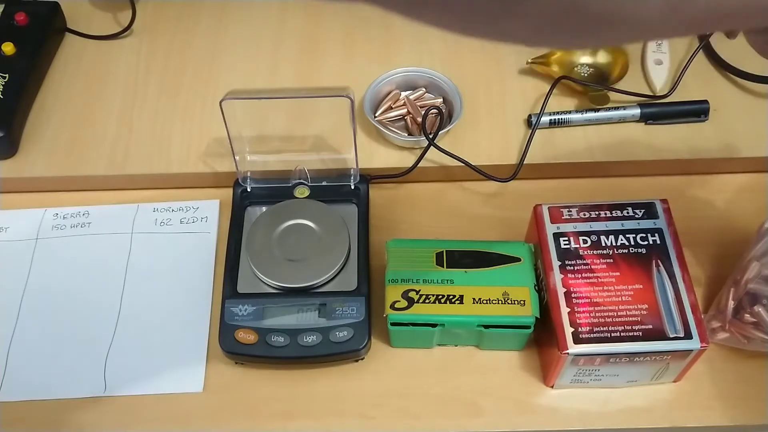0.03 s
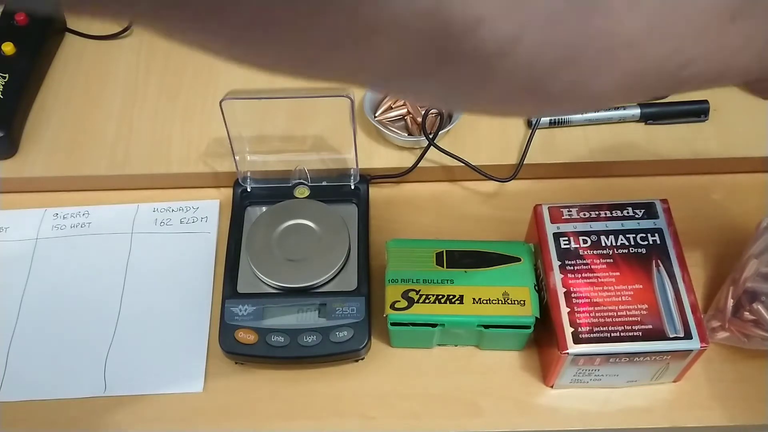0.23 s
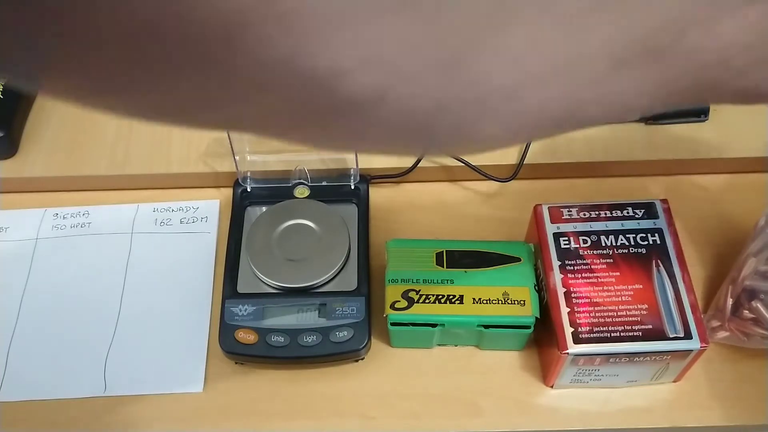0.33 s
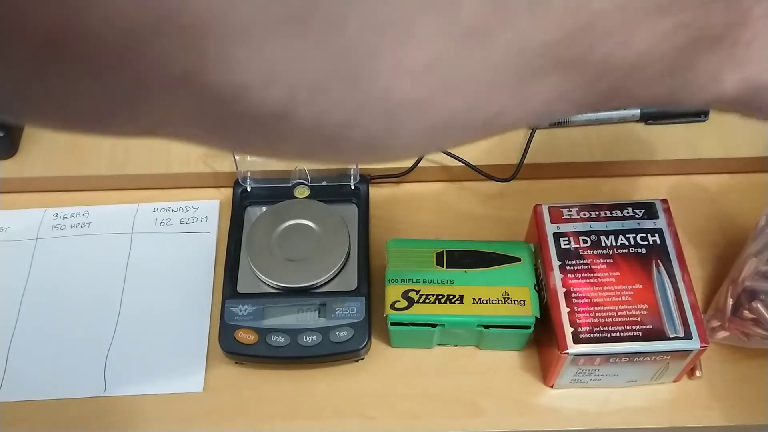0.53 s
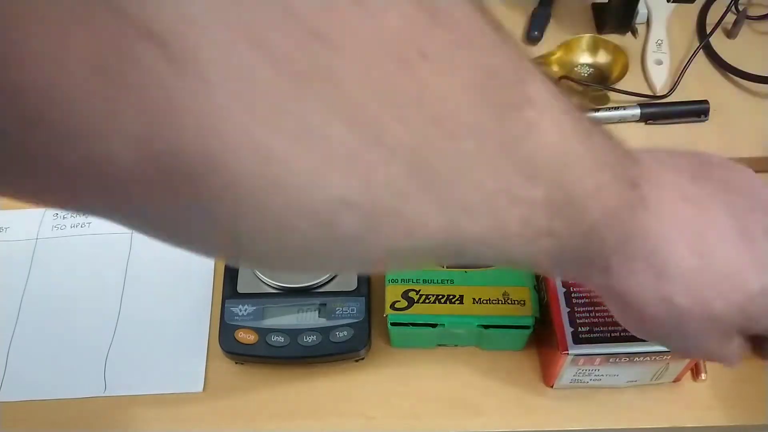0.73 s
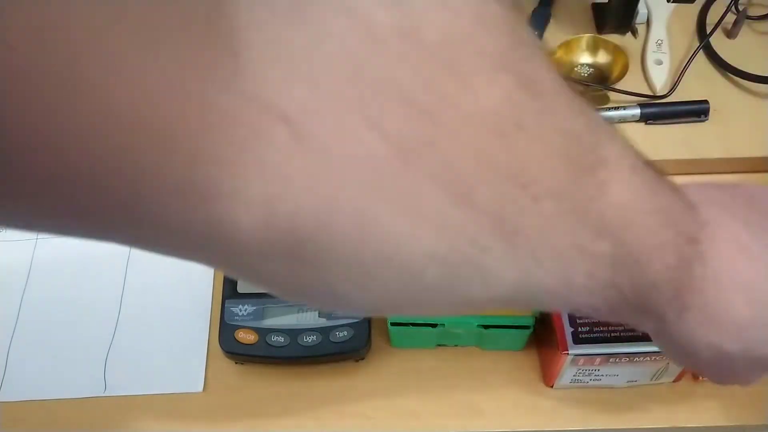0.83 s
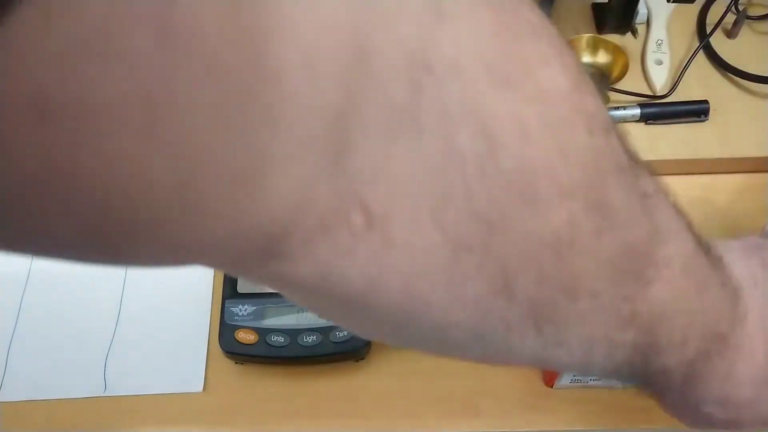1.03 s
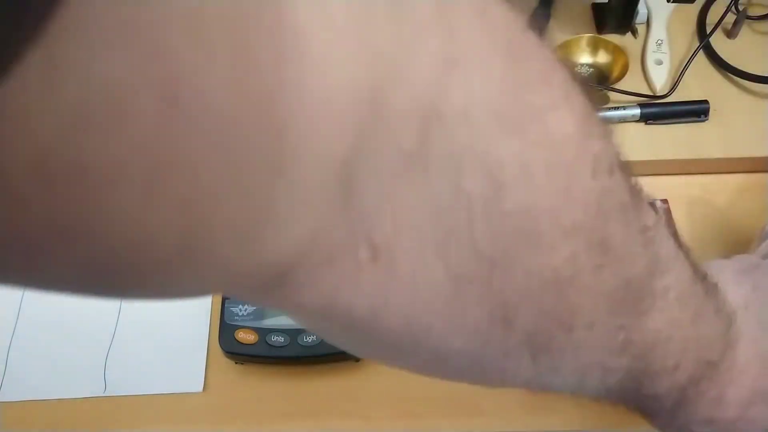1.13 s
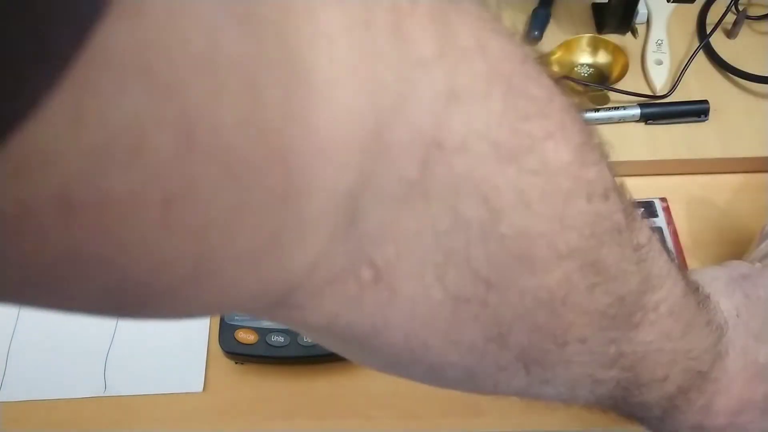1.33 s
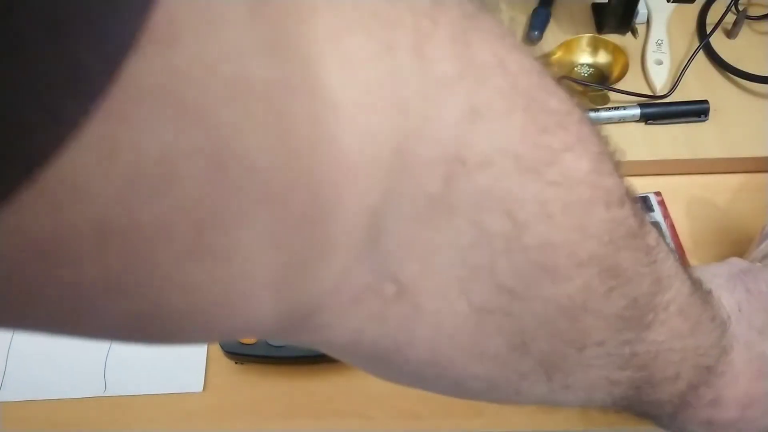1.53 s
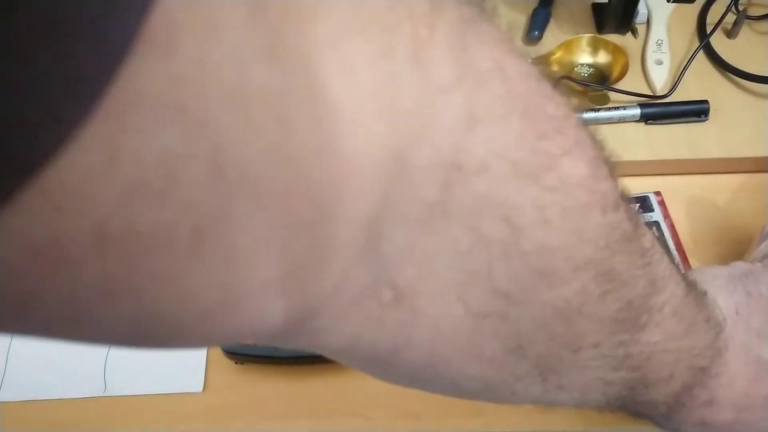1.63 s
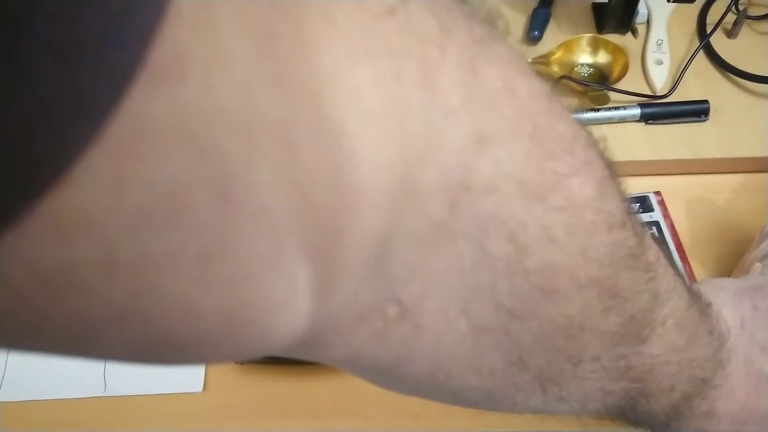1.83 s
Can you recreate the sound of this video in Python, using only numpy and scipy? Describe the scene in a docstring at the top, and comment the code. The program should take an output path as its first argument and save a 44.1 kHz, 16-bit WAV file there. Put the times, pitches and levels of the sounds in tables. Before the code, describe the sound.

A bag of loose metal bullets lands on a wooden desk, close on the right: sharp plastic crackle and dense clinking, smaller clinks as the heap settles, then two soft knocks in a quiet small room.

```python
"""Bag of bullets set down on a desk

A plastic bag of loose metal bullets lands on a wooden desk, close to the right of the microphone.
Showers of contacts excite the resonances of the heap; short bright bursts are the snapping film.
Decaying sines and dull bursts are the desk, which gives two soft knocks later.
Decaying noise forms the small room, over soft steady noise and a low hum."""
import sys
import numpy as np
from scipy import signal
from scipy.fft import rfft
from scipy.io import wavfile
from scipy.ndimage import uniform_filter1d

SR = 44100
rng = np.random.default_rng(int(sys.argv[2]) if len(sys.argv) > 2 else 0)


def store_pcm(level_fs):
    """Save levels as 16-bit WAV."""
    pcm = np.round(np.clip(level_fs, -1, 1) * 32767).astype(np.int16)
    wavfile.write(sys.argv[1], SR, np.atleast_2d(pcm).T)


N = 83790  # length in samples


def bullets():
    """Modal resonance: each clump is a shower of metal contacts that rings the shifting heap."""
    # clumps of bullets falling together: t/s, level/dB (before clink_db), bass/dB, treble/dB, settling time/s
    clumps = [(0.2285, -20.5, 14.5, 9.5, 0.0035), (0.2459, -6, -3, 3.5, 0.0062),
              (0.2508, 1.5, 0.5, 0, 0.0089), (0.2605, -3, -3.5, 2, 0.0068), (0.2690, -5, -3.5, 6.5, 0.0047),
              (0.2775, -9.5, -10, -0.5, 0.0081), (0.2892, -14.5, -5.5, 1.5, 0.0062),
              (0.3121, -19, -15, 1, 0.0036), (0.3737, -7, -0.5, -19.5, 0.0095),
              (0.4030, -14, 0, -10, 0.0065), (0.4288, -16.5, 2, -5, 0.006), (0.453, -24, -4, 1.5, 0.0095),
              (0.4724, -18, 3, 14, 0.012), (0.4779, -3.5, -10, 3, 0.0076), (0.4896, -14, -5, 1, .012),
              (0.511, -24, 0, 15, 0.0055), (0.5255, -28, -6, -2, 0.0045), (0.5435, -5, -2.5, -3.5, 0.0089),
              (0.5550, -13, 6.5, -4, 0.005), (0.576, -29, -11, 17, 0.024), (0.6092, -11, 3, -2, 0.0069),
              (0.621, -12.5, -3.5, -2.5, 0.0052), (0.6430, -20, 7, 11.5, 0.011),
              (0.6566, -13.5, 1.5, 3, 0.014), (0.6830, -12.5, 1, -8.5, .013),
              (0.7081, -17, 5.5, -11, 0.0081), (0.739, -26, 12.5, -23, 0.017), (0.7870, -32, 7, -20, 0.017),
              (0.8172, -31.5, 4, -51, .014)]
    # colour of the heap: f/Hz, level/dB
    heap_colour = [(30, -42), (100, -17), (165, -32), (220, -20.5), (280, -10.5), (380, -9), (500, -4.5),
                   (640, -6), (1000, -3.5), (1500, 0), (2400, 2), (3300, -2.5), (4400, -10.5),
                   (6000, -22.5), (7400, -21), (9000, -26), (12000, -29), (15000, -25.5)]
    # resonances and hollows of the heap on the desk: f/Hz, width/Hz (before the floor min_width_hz),
    # level over the colour while landing/dB, level over the colour once lying/dB
    rings = [(272, 25, 6, 6), (440, 92, 10, 8), (669, 70, -10.5, -7), (827, 26, 3, 7), (919.3, 42, 10, 7.5),
             (1050, 200, -4.5, 0.5), (1230, 35, 4.5, 2), (1315, 10, 3, 4.5), (1419, 69, 12, 10.5),
             (1460, 60, -10, -6), (1605, 32, 3, 5), (1698, 40, -3, -8), (1790, 20, 6.5, 3.5),
             (1885, 32, -10, -4.5), (2014, 35, -3.5, -8.5), (2155, 14, 4, 8), (2253, 19, 8.5, 8.5),
             (2402, 36, 9.5, 3), (2455, 40, -12.5, -2.5), (2853, 45, 3.5, 7.5), (2906, 27, 2.5, 4.5),
             (3012, 45, -0.5, -2.5), (3050, 28, 0, 3.5), (3320, 44, 11.5, 6), (3413, 62, -4, -4.5),
             (3550, 43, -8, -2), (3675, 34, 4, 5.5), (3980, 45, 9, 7.5), (4135, 94, 7, 4.5),
             (4320, 80, 1.5, -6.5), (4675, 59, 8, -0.5), (4965, 55, 11, -6), (7250, 400, 10.5, -2.5)]
    bass_hz, treble_hz = 810, 4060  # corners of each clump's own colour
    clink_db, landed_s = 17, .36
    ring_drift, ring_spread_db, min_width_hz = .004, 1., 42  # drift is a fraction of the frequency

    hz, out = grid(), np.zeros((2, N))
    ring_hz, width_hz, landing_db, lying_db = np.transpose(rings)
    width_hz = np.maximum(width_hz, min_width_hz)
    bass = 1 / (1 + (hz / bass_hz) ** 2)
    treble = 1 - 1 / (1 + (hz / treble_hz) ** 4)
    for s, db, bass_db, treble_db, settle_s in clumps:
        # every clump finds the heap slightly rearranged
        drift, favour = rng.standard_normal((2, len(rings)))
        centre_hz = ring_hz * (1 + ring_drift * drift)
        peaks = 1 / (1 + (2 * (hz[:, None] - centre_hz) / width_hz) ** 2)
        ring_db = landing_db if s < landed_s else lying_db
        heap_db = read(heap_colour, hz) + peaks @ (ring_db + ring_spread_db * favour)
        colour_db = heap_db + bass_db * bass + treble_db * treble
        clink = convolve(contacts(settle_s), ringing(colour_db))
        add(out, s, amp(clink_db + db) * unit(clink))
    return out


def bag():
    """Buckling and friction of a thin film: short bright snaps, and a faint rustle as it moves."""
    # snaps of the plastic film: t/s, level/dB
    snaps = [(0.191, -20), (0.213, -31.5), (0.2280, -15.5), (0.239, -14.5), (0.2461, -2.5), (0.2512, 5),
             (0.2540, -1.5), (0.3733, -8), (0.4791, -5.5)]
    # colour of the snaps: f/Hz, level/dB
    film = [(200, -22.5), (1000, 2.5), (3500, -0.5), (6000, 0), (10000, -11.5), (15000, -9)]
    # the bag is carried in and let go: t of the peak/s, RMS level at the peak/dB, half length/s
    rustles = [(0.0300, -60, .15), (1.6850, -60, .055)]
    # relative colour of the rustle: f/Hz, level/dB
    rustle_colour = [(100, -10.5), (330, 5), (450, 4), (800, -5.5), (1500, -5.5), (2600, -1.5), (3800, 1.5),
                     (5500, -8), (7400, -4), (10000, -5.5), (15000, -16.5)]
    snap_s = .002  # settling time

    t = np.arange(N) / SR
    rustle = convolve(rng.standard_normal((2, N)), ringing(read(rustle_colour, grid())))
    motion = sum(amp(db) * np.exp(-((t - s) / half_s) ** 2) for s, db, half_s in rustles)
    crackle = bursts([(s, db, snap_s) for s, db in snaps], film)
    return crackle + motion * rustle / rustle.std()


def desk():
    """Modal response of a struck plate: the bag touches the desk, lands on it, and is nudged later."""
    # dull scuffs of the bag and hand on the desk: t/s, level/dB, settling time/s
    scuffs = [(0.1480, -27, .008), (0.1915, -20, .008), (0.2392, -2, .004), (0.3880, -7, .007),
              (1.1520, -28, .012), (1.1780, -24, .008), (1.6275, -23, .007), (1.6420, -20, .008),
              (1.6860, -19, .009), (1.7130, -22, .009), (1.7450, -27, .006), (1.8050, -27, .025)]
    # colour of the scuffs: f/Hz, level/dB
    scuff_colour = [(60, -18), (170, -16), (400, 0), (600, -5), (800, -1), (1400, -1), (2000, -12),
                    (4000, -19), (8000, -30), (15000, -38)]
    # modes of the first touch: f/Hz, level/dB (before touch_db), T60/s
    touch = [(212, -6, 0.069), (390, -2.5, 0.034), (764, -0.5, .045), (1095, -7, 0.059)]
    # dull knocks on the desk: t/s, level/dB, pitch f/Hz, upper modes/dB, hold/s, T60 of the pitch/s
    knocks = [(0.2393, -12, 385, -9, .005, .02), (0.3880, -26, 365, -10, .005, .025),
              (1.6275, -29.5, 385, -2, .005, .02), (1.6860, -30.5, 371, -2, .013, .03)]
    # modes of the desk: ratio to the pitch, level/dB (before the knock's own), share of the ring time
    desk_modes = [(1, 0, 1), (2, -13, .9), (3, -7, .9), (3.35, -16, .7), (3.94, -8, .8)]
    # the whole desk gives under the weight: t/s, level/dB
    thuds = [(0.244, -37), (0.3850, -48), (0.487, -44), (0.551, -44.5), (0.704, -44), (1.011, -39.5),
             (1.164, -42.5)]
    touch_s, touch_db, touch_hold_s = .1912, -31, 0.0072
    blow_rise_s = .0012  # of the touch and the knocks
    thud_hz, thud_t60_s, thud_rise_s = 92, 0.12, 0.0043

    out = bursts(scuffs, scuff_colour)
    add(out, touch_s, amp(touch_db) * struck(touch, blow_rise_s, touch_hold_s))
    for s, db, pitch_hz, upper_db, hold_s, ring_s in knocks:
        modes = []
        for k, (ratio, mode_db, share) in enumerate(desk_modes):
            # upper_db sets the hardness of the blow: it spares the lowest mode
            modes.append((pitch_hz * ratio, mode_db + upper_db * (k > 0), ring_s * share))
        add(out, s, amp(db) * struck(modes, blow_rise_s, hold_s))
    for s, db in thuds:
        add(out, s, amp(db) * struck([(thud_hz, 0, thud_t60_s)], thud_rise_s))
    return out


def contacts(settle_s, size=4096):
    """Random impulse train: a first contact and a dying shower, whitened for each side."""
    contacts_per_s, spread_db = 7000, 3.5
    first_contact, gather_s = 0.9, .002

    t = np.arange(size) / SR
    signs = rng.choice([-1., 1.], (2, size))
    sizes = signs * amp(spread_db * np.clip(rng.standard_normal((2, size)), -2, 2))
    hits = rng.random((2, size)) < contacts_per_s / SR
    shower = sizes * hits * np.exp(-t / settle_s) * (1 - np.exp(-t / gather_s))
    shower[:, 0] = first_contact
    return evened(shower, size=18)


def bursts(rows, colour):
    """Source and filter: short showers of contacts through one spectral colour."""
    out, response = np.zeros((2, N)), ringing(read(colour, grid()))
    for s, db, settle_s in rows:
        add(out, s, amp(db) * unit(convolve(contacts(settle_s), response)))
    return out


def struck(modes, rise_s, hold_s=0, size=12000):
    """Modal synthesis: sines rise with a soft blow, hold while it pushes, then decay exponentially."""
    t = np.arange(size) / SR
    free_s = np.maximum(t - hold_s, 0)  # time since the push ended
    ring = 0
    for hz, db, t60 in modes:
        decay = np.exp(-np.log(1000) * free_s / t60)
        ring = ring + amp(db) * decay * np.sin(2 * np.pi * hz * t)
    return (1 - np.exp(-t / rise_s)) * ring


def shade_left(left):
    """Acoustic shadow: the left side, away from the source, is weaker by frequency."""
    # gain of the left side: f/Hz, level/dB
    shadow = [(60, -20), (200, -26), (380, -12), (700, -21), (1600, -19), (2400, -18), (4400, -16.5),
              (8000, -20), (10000, -17), (15000, -20)]
    return convolve(left, ringing(read(shadow, grid())))[0]


def room(x, count=4):
    """Reverberation: the echo pattern changes as the heap shifts, several tails taking turns."""
    shift_s = .07  # from one tail to the next
    turn = np.arange(N) / SR / shift_s
    out = 0
    for k in range(count):
        distance = abs((turn - k + count / 2) % count - count / 2)
        share = np.cos(np.pi / 2 * np.minimum(distance, 1))  # equal-power crossfade
        out = out + convolve(x * share, tail())
    return out


def tail(size=256):
    """Diffuse decay: noise in which each band dies at its own reverberation time."""
    # reverberation time of the room: f/Hz, T60/s
    room_t60 = [(100, 0.13), (300, 0.19), (700, 0.33), (1800, 0.24), (4500, 0.26), (9000, 0.45),
                (15000, 0.067)]
    delay_s = 0.013  # time scale on which the echoes build up

    hz, t, z = signal.stft(rng.standard_normal((2, SR // 2)), SR, nperseg=size)
    decay = np.exp(-np.log(1000) * t / read(room_t60, hz)[:, None])
    wash = signal.istft(z * decay, SR, nperseg=size)[1]
    build_up = 1 - np.exp(-(np.arange(wash.shape[1]) / SR / delay_s) ** 2)
    return unit(wash * build_up)


def air(size=1024):
    """Stationary background: soft, slightly patchy coloured noise and a sinusoidal mains hum."""
    # relative colour of the still air: f/Hz, level per Hz/dB
    air_colour = [(20, -22), (45, -4), (75, -3), (100, 1), (150, -8), (250, -5), (450, -1), (850, -4),
                  (1500, -12), (3000, -21), (6000, -31), (10000, -33), (15000, -34)]
    noise_db, patch_db = -54, 1.5
    hum_hz, hum_db = 100, -63  # RMS level, like noise_db on the right side
    left_db = -17.5  # left side relative to the right

    hz, t, z = signal.stft(rng.standard_normal((2, N)), SR, nperseg=size)
    patches = uniform_filter1d(rng.standard_normal(z.shape[1:]), size=10, axis=0)
    patches = uniform_filter1d(patches, size=6, axis=1)
    gain_db = read(air_colour, hz)[:, None] + patch_db * patches / patches.std()
    noise = signal.istft(z * amp(gain_db), SR, nperseg=size)[1][:, :N]
    hum = amp(hum_db) * np.sqrt(2) * np.sin(2 * np.pi * hum_hz * np.arange(N) / SR)
    return (amp(noise_db) * noise / noise.std() + hum) * amp([[left_db], [0]])


def amp(db):
    """Decibel law: level to amplitude ratio."""
    return 10 ** (np.asarray(db) / 20)


def unit(x):
    """Energy normalisation: scales each side to energy 1."""
    return x / np.sqrt(np.sum(x ** 2, -1, keepdims=True) + 1e-20)


def read(points, hz):
    """Interpolation of a table on a log-frequency axis."""
    f, value = np.transpose(points)
    return np.interp(np.log(hz + 1), np.log(f + 1), value)


def add(mix, s, sound):
    """Superposition: adds a sound to the mix from time s, cut at the end of the mix."""
    part = mix[:, round(s * SR):][:, :sound.shape[-1]]
    part += sound[..., :part.shape[1]]


def grid(size=8192):
    """Frequencies in Hz of a discrete Fourier transform, for the filters."""
    return np.fft.rfftfreq(size, 1 / SR)


def ringing(db):
    """Minimum phase: the causal impulse response with this gain over the frequency grid."""
    log_gain = np.log(amp(np.concatenate([db, db[-2:0:-1]])))
    spectrum = np.exp(np.conj(signal.hilbert(log_gain)))  # phase follows from the log gain
    return np.fft.ifft(spectrum).real[:len(db)]


def convolve(x, response):
    """Linear filtering of each side by an impulse response, cut to the scene's length."""
    return signal.fftconvolve(np.atleast_2d(x), np.atleast_2d(response), axes=1)[:, :N]


def evened(x, size):
    """Spectral whitening: an inverse filter evens out each side's colour over bands of size bins."""
    power = uniform_filter1d(abs(rfft(x, 2 * x.shape[1])) ** 2, size=size, axis=1)
    return unit(convolve(x, [ringing(-10 * np.log10(side + 1e-9)) for side in power]))


def scene():
    """Superposition of direct sound, room and background, the left side in shadow."""
    bright_room_db, dull_room_db = -9.5, -12
    bright, dull = bullets() + bag(), desk()
    echoes = room(amp(bright_room_db) * bright + amp(dull_room_db) * dull)
    left, right = bright + dull + echoes
    return np.array([shade_left(left), right]) + air()


def record(dry):
    """Soft saturation rounds off the loudest peaks; then a low-pass filter limits the band."""
    ceiling, edge_hz = .95, 15750
    soft = dry / (1 + (dry / ceiling) ** 6) ** (1 / 6)
    low_pass = signal.firwin(401, edge_hz, window=("kaiser", 9), fs=SR)
    return signal.oaconvolve(soft, low_pass[None], "same")


dry = scene()
out = record(dry)
store_pcm(out)
```